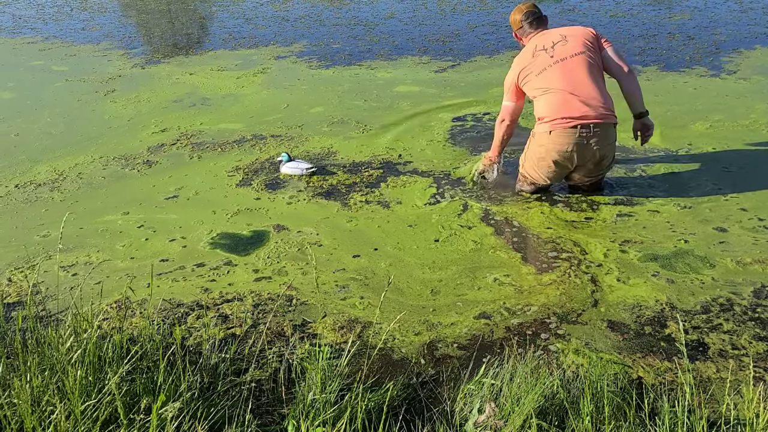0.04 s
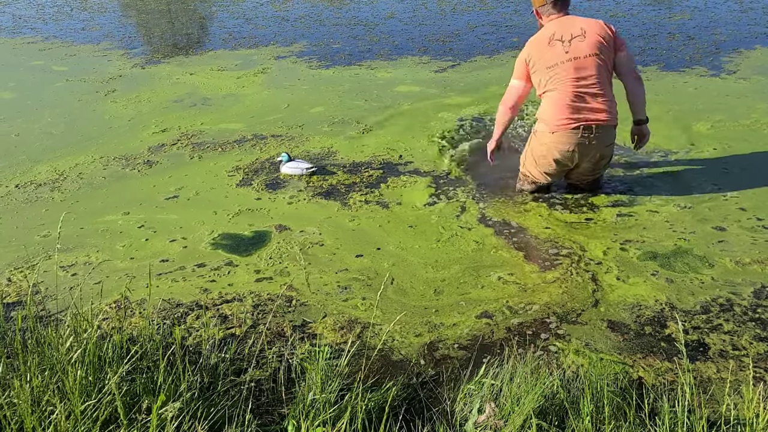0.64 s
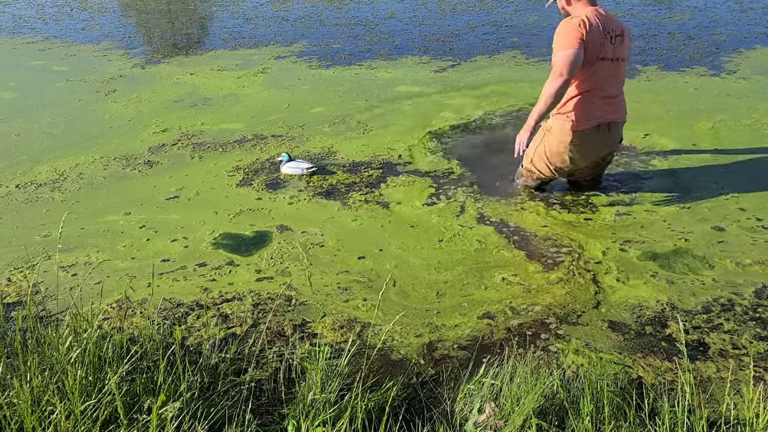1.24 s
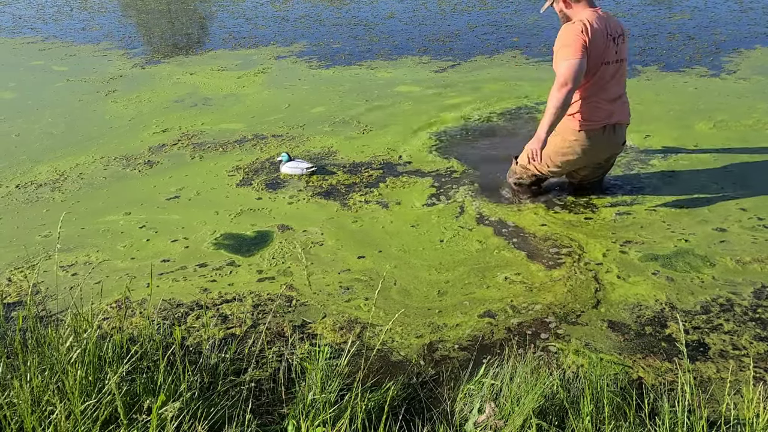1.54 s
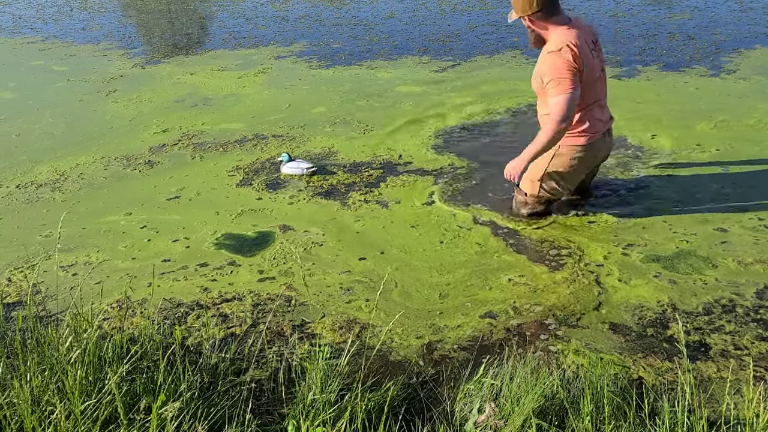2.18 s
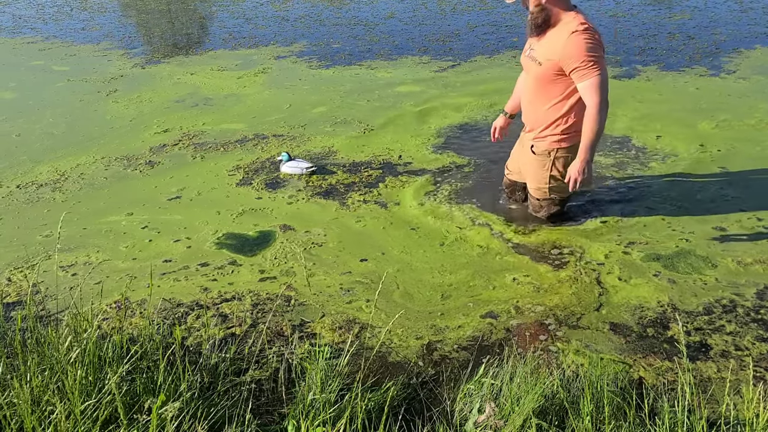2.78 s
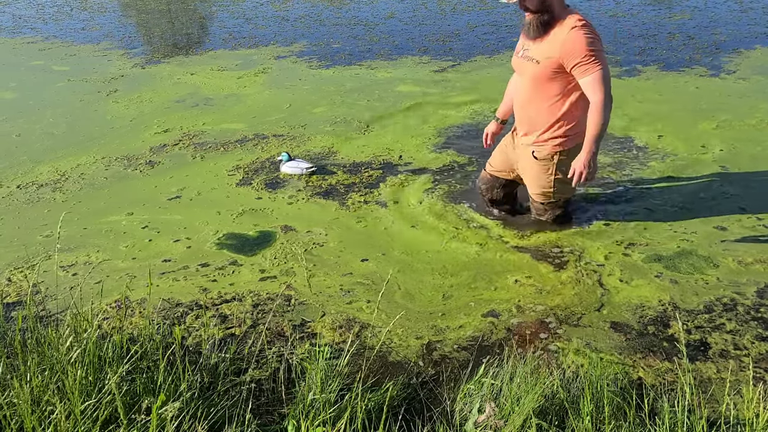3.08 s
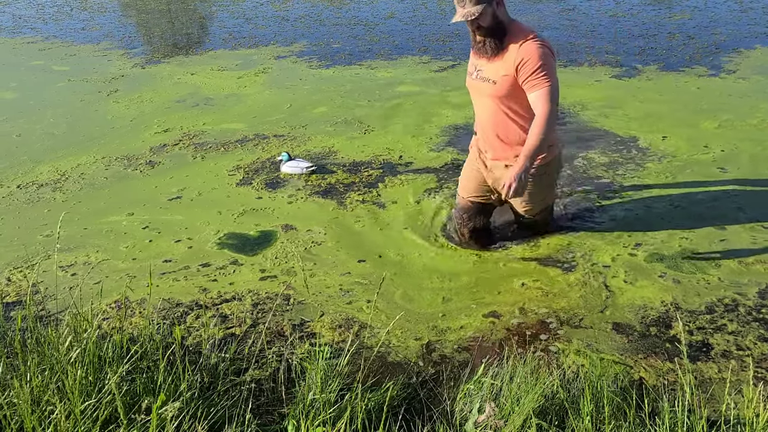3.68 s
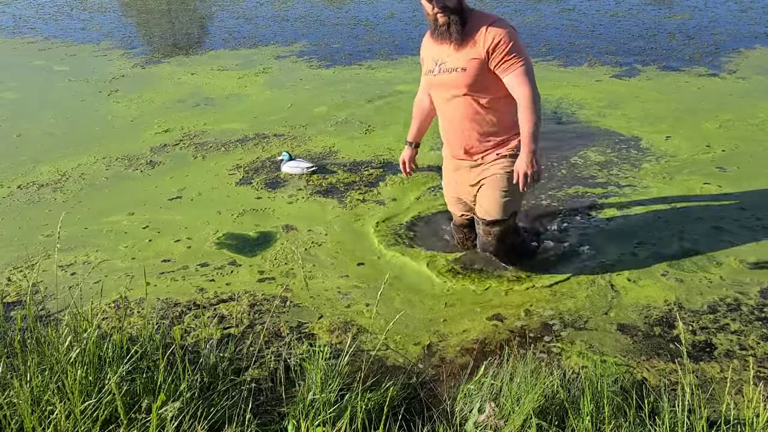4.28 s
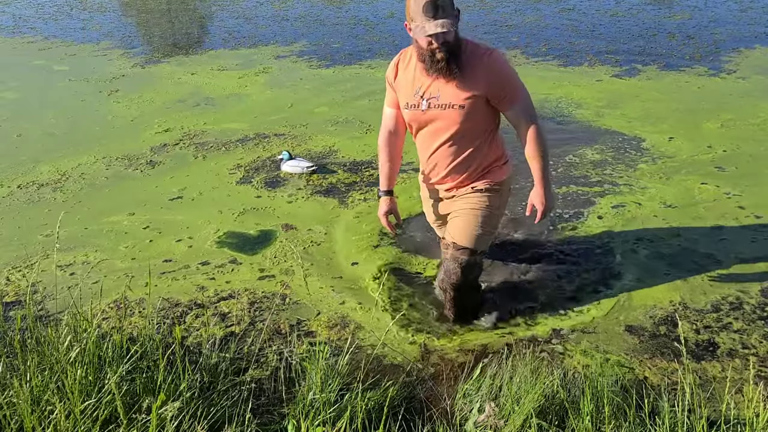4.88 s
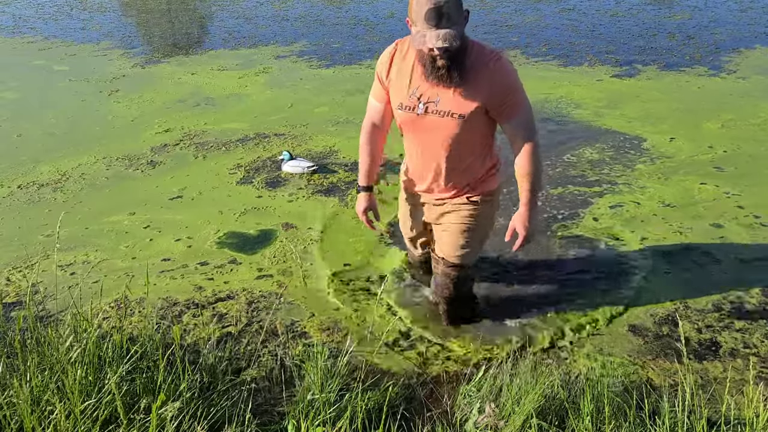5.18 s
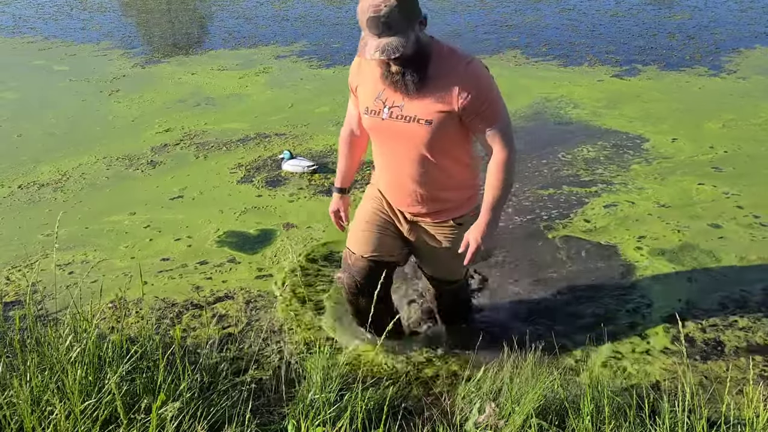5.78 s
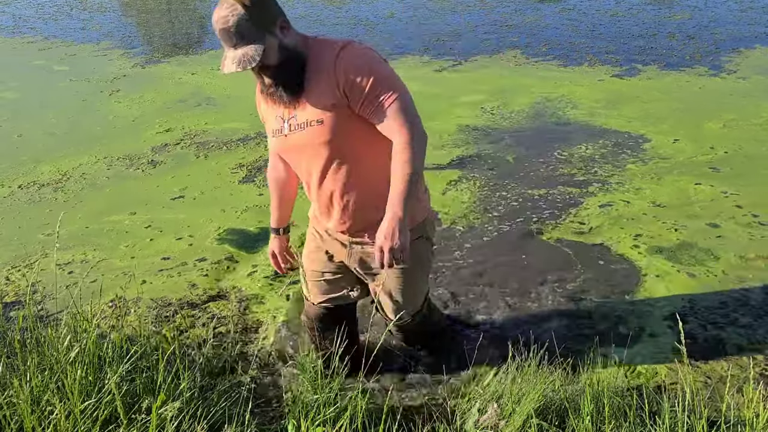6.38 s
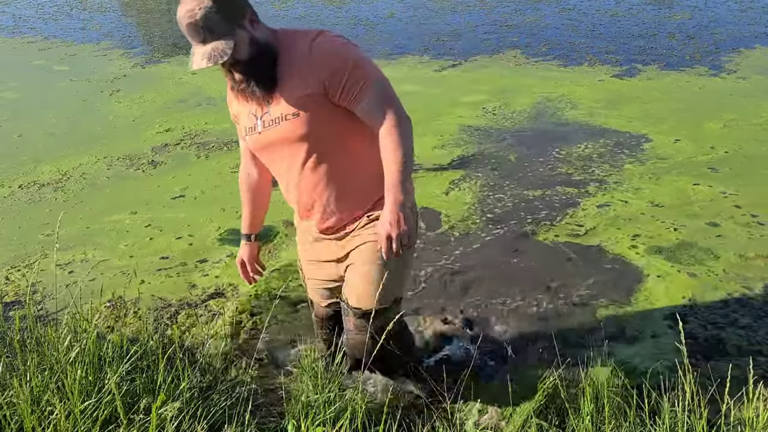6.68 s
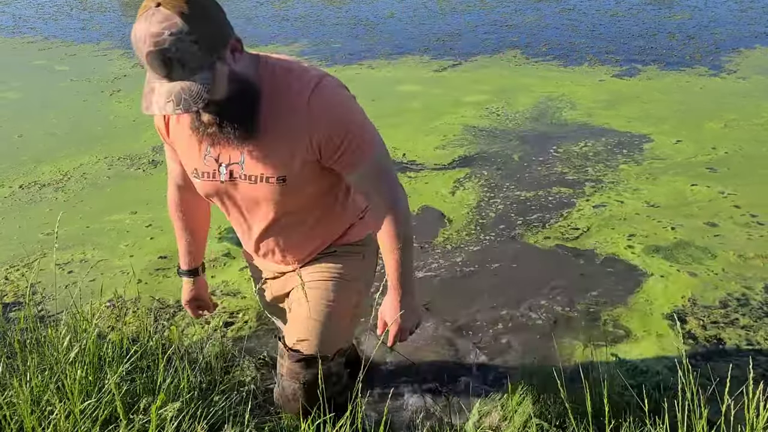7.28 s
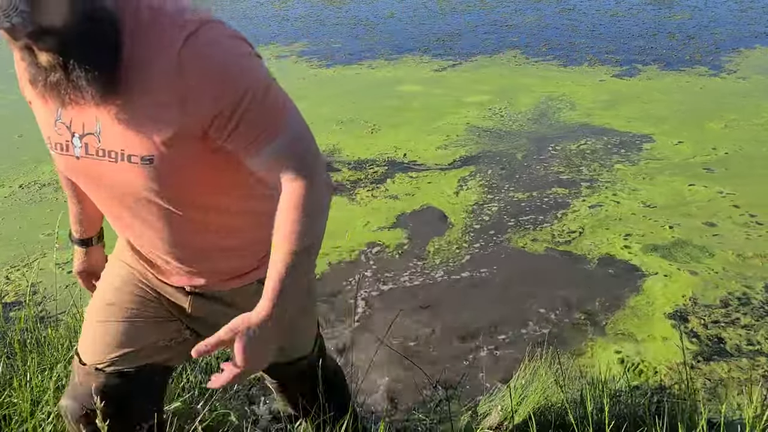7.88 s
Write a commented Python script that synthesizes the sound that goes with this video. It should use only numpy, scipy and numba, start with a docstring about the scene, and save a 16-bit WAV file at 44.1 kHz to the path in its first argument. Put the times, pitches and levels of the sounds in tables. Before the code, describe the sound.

Wading steps gurgle, plop and splash closer through a weedy pond while small birds call and a distant engine hums faintly.

```python
"""A weedy pond: a man in waders walks out towards the bank, growing louder as he comes.
Each stroke of a hand or leg pushes a wave that folds air under (gulps, sloshing bubbles, plops,
slaps) and sheds a spray of drops. At the end, bank grass brushes the waders.
Songbirds call around the pond and a far engine drones under the quiet outdoor air."""
import sys
import numpy as np
from scipy import signal
from scipy.fft import rfft, irfft, next_fast_len
from scipy.io import wavfile
from scipy.ndimage import uniform_filter1d, map_coordinates
from numba import njit

SR = 44100
rng = np.random.default_rng(int(sys.argv[2]) if len(sys.argv) > 2 else 0)


def digitize_waveform(pressure):
    """Quantize a signal to 16-bit integers and store it at the path in sys.argv[1].

    Rows of a 2-D input are taken as channels; values are limited to [-1, 1].
    """
    field = np.atleast_2d(pressure).T
    bounded = np.clip(field, -1, 1)
    quanta = np.round(bounded * 32767).astype(np.int16)
    wavfile.write(sys.argv[1], SR, quanta)


N = 350150
TIME = np.arange(N) / SR

# Pushes through the water: a hand sweeps weed aside, he turns, wades thigh deep, strides through
# the shallows and climbs the bank.
# (time at full force [s], swell [s], hold [s], gulps [dB], slosh [dB], splash [dB], spray [dB])
STROKES = [ (0.03, 0.029, 0.19, -67, -56, -72, -56.5), (0.184, 0.047, 0.16, -70, -52.5, -52, -43),
           (0.464, 0.076, 0.18, -69, -59, -53.5, -47.5), (0.62, 0.029, 0.085, -61, -44.5, -52.5, -49.5),
           (0.699, 0.03, 0.025, -52.5, -51.5, -48.5, -53.5), (.78, 0.029, 0.058, -67, -48.5, -62, -79.5),
           (1.437, 0.04, 0.028, -75, -67.5, -62.5, -62.5), (1.554, 0.052, 0.15, -74, -67, -83, -76),
           (1.765, .02, 0.028, -63, -62, -57, -70), (1.834, 0.032, 0.016, -72, -71, -70, -63.5),
           (3.191, 0.16, 0.19, -68.5, -59.5, -64.5, -66), (3.396, 0.045, 0.064, -71, -71, -62, -66.5),
           (3.549, 0.053, 0.36, -71.5, -58.5, -63, -66), (3.989, 0.064, 0.099, -67.5, -60.5, -58, -61),
           (4.207, .08, 0.12, -74, -67.5, -68.5, -64), (4.414, 0.054, 0.029, -67, -46, -48.5, -54),
           (4.481, 0.041, 0.09, -79, -53.5, -52.5, -51.5), (4.622, 0.026, 0.056, -56.5, -55, -56.5, -54.5),
           (4.693, 0.04, .06, -63.5, -41.5, -48, -54), (4.78, 0.074, 0.084, -45.5, -45, -44.5, -52),
           (4.891, .01, .11, -43.5, -40, -45, -49), (5.059, 0.0086, 0.015, -44, -42.5, -49.5, -59),
           (5.16, 0.095, .04, -64, -51, -59, -66.5), (5.375, 0.15, 0.09, -64, -59.5, -63, -62.5),
           (5.51, 0.095, .01, -65, -59, -49, -65), (5.588, 0.025, 0.012, -51, -40, -36, -48.5),
           (5.716, 0.09, 0.07, -63, -49.5, -48.5, -50), (5.86, 0.13, 0.12, -49.5, -44, -41, -42),
           (5.998, .08, 0.15, -45, -41.5, -41.5, -49), (6.201, .08, 0.073, -49.5, -45.5, -41, -49),
           (6.337, 0.087, 0.077, -47.5, -48, -51, -50.5), (6.577, 0.0088, 0.035, -73.5, -58, -49.5, -58),
           (6.656, .04, 0.019, -77, -42.5, -44, -53), (6.701, .012, 0.083, -44, -35.5, -41, -53.5),
           (6.807, 0.063, 0.19, -40, -38.5, -37.5, -40), (7.003, 0.13, 0.1, -44, -42, -39, -37),
           (7.212, 0.057, 0.026, -66, -59, -54, -54), (7.342, 0.088, 0.17, -67.5, -64, -64.5, -61),
           (7.526, 0.02, 0.2, -57, -42.5, -40.5, -57.5), (7.659, 0.024, 0.06, -42.5, -37, -38.5, -47),
           (7.795, 0.11, 0.12, -48, -44.5, -45.5, -42), (7.908, 0.058, 0.031, -48.5, -50, -37.5, -38.5)]
# Colour of the fine spray: (frequency [Hz], relative level [dB])
SPRAY = [(900, -29), (1400, 7.5), (2100, 8), (3100, 10), (4000, 4.5), (5200, 2), (6700, -5.5), (8000, -0.5),
         (10300, -6.5), (12500, -2.5), (15500, -7)]


def from_db(db):
    """Decibels to gain."""
    return 10 ** (np.asarray(db) / 20)


def rms_one(x):
    """Scale to unit power."""
    return x / np.sqrt(np.mean(x ** 2) + 1e-20)


def in_time(rows):
    """Each column of an automation curve at every sample."""
    s, *columns = np.transpose(rows)
    return [np.interp(TIME, s, c) for c in columns]


def at_hz(points, hz):
    """Read a curve on a log-frequency axis."""
    f, value = np.transpose(points)
    return np.interp(np.log(np.maximum(hz, 1)), np.log(f), value)


def equalise(x, gain_at):
    """Filter by a smooth gain, given as a function of frequency."""
    size = next_fast_len(N + 4096)
    return irfft(rfft(x, size) * gain_at(np.fft.rfftfreq(size, 1 / SR)), size)[..., :N]


def coloured(x, spectrum):
    """Give a signal a spectrum, at unit power."""
    return rms_one(equalise(x, lambda hz: from_db(at_hz(spectrum, hz))))


def drift(per_s):
    """A random modulator with a spread of one, gliding to per_s new values a second."""
    knots = rng.standard_normal(4000)
    return rms_one(map_coordinates(knots, [TIME * per_s], order=1, mode="wrap"))


def bandpass(x, low_hz, high_hz, order=2):
    """Keep one band, with gentle slopes."""
    return signal.sosfilt(signal.butter(order, [low_hz, high_hz], "band", fs=SR, output="sos"), x)


def bursts(s, level_db, t60):
    """Noise hits with an instant attack, dying by 60 dB in t60 seconds; rows: mid, side."""
    hits = np.zeros(N)
    hits[np.clip(s * SR, 0, N - 1).astype(int)] = from_db(level_db)
    envelope = signal.lfilter([1], [1, -from_db(-60 / (t60 * SR))], hits + 1e-18)
    return envelope * rng.standard_normal((2, N))


def reflections(x, t60):
    """A diffuse tail off water, reeds and bank, about as strong as the sound itself."""
    t = TIME[:SR // 2]
    tail = rng.standard_normal((2, len(t))) * from_db(-60 * t / t60) * (1 - np.exp(-20 * t / t60))
    return signal.fftconvolve(x[:1], tail / np.linalg.norm(tail[0]), axes=1)[:, :N]


def outdoor_air(level_db):
    """A steady bed of low rumble and faint hiss."""
    # Colour of the air: (frequency [Hz], relative level [dB])
    air_spectrum = [(20, -14), (32, -19), (45, 4.5), (70, 4), (100, -1.5), (130, -15.5), (180, -25),
                    (260, -23.5), (390, -16.5), (600, -22.5), (1000, -24), (2000, -26.5), (2900, -24.5),
                    (5200, -34), (7000, -42.5), (15500, -40)]
    return from_db(level_db) * coloured(rng.standard_normal((2, N)), air_spectrum)


def far_engine(drone_hz, drone_db, waver_db):
    """Two low tones of distant machinery, wavering on their way through the air."""
    # The engine slowly speeds up, then eases off: (time [s], pitch [Hz], level [dB])
    revs = [(0, 60.9, -61), (.9, 63.7, -56), (2, 68.7, -55.5), (3, 73.3, -53), (4.5, 77.35, -60.5),
            (5.6, 79.7, -57.5), (7.94, 76.1, -71.5)]
    hz, tone_db = in_time(revs)
    climbing = from_db(tone_db + waver_db * drift(7.8)) * np.sin(2 * np.pi * np.cumsum(hz) / SR)
    drone_gain = from_db(drone_db + waver_db * drift(3.7))
    drone = drone_gain * np.sin(2 * np.pi * np.cumsum(drone_hz + 0.47 * drift(3.6)) / SR)
    return np.sqrt(2) * (climbing + drone)


def birds(echo_db, echo_t60, warble):
    """Whistles that bend through three pitches, some with a rasping warble, trailed by their echo."""
    # Cues for each kind of note: (time [s], level [dB])
    calls = {"chip": [(.192, -41), (.33, -53.5), (.518, -44), (.736, -43), (.952, -45.5)],
             "tsip": [(.11, -60), (.871, -63.5)], "buzz": [(.875, -58), (3.215, -60), (3.45, -52.5),
             (3.685, -53.5), (4.81, -54.5)], "churr": [(.99, -63), (1.2, -63.5), (1.47, -61.5)],
             "zeet": [(1.07, -69), (2.26, -71), (2.545, -65.5), (2.855, -62)], "pip": [(3.11, -61)],
             "arch": [(1.589, -49)], "quaver": [(2.771, -55.5)], "slur": [(2.2, -60), (3.44, -54.5),
             (4.205, -57.5)], "teeu": [(2.017, -47.5), (4.115, -55)], "flick": [(5.196, -53.5),
             (5.378, -56.5), (5.543, -55)], "hook": [(5.207, -47.5), (5.386, -48.5), (5.548, -52.5)]}
    # Shape of each kind: (length [s], start pitch [Hz], middle pitch [Hz], end pitch [Hz], rasp [0-1])
    note_shapes = {"chip": (0.038, 3900, 3130, 2820, 0.11), "tsip": (0.041, 5800, 5970, 7200, .1),
                   "buzz": (.095, 6800, 4500, 3500, .75), "zeet": (.06, 5200, 4900, 4750, 0.74),
                   "arch": (0.28, 2520, 3010, 2560, 0.063), "quaver": (0.24, 2780, 3000, 2700, 0.38),
                   "slur": (.11, 3200, 2500, 2250, 0.55), "teeu": (.055, 3600, 2830, 2600, 0.17),
                   "flick": (0.027, 5750, 5450, 4800, 0.33), "hook": (.028, 3650, 3850, 5250, 0.11),
                   "churr": (.13, 2900, 3400, 4600, 0.98), "pip": (0.07, 5200, 5220, 5180, 0.5)}
    song, shake, tremble = np.zeros(N), drift(800), drift(90)
    for kind, notes in calls.items():
        length, *pitches, rasp = note_shapes[kind]
        progress = np.linspace(0, 1, int(length * SR))
        glide_hz = np.polyval(np.polyfit([0, .5, 1], pitches, 2), progress)
        envelope = np.sin(np.pi * progress) ** .5
        for s, level_db in notes:
            span = slice(int(s * SR), int(s * SR) + len(progress))
            hz = glide_hz * (1 + warble * rasp * shake[span])
            gain = from_db(level_db + (2.0 + 4.1 * rasp) * tremble[span])
            song[span] += gain * envelope * np.sin(2 * np.pi * np.cumsum(hz) / SR)
    direct = np.array([song, np.zeros(N)])
    return direct + from_db(echo_db) * reflections(direct, echo_t60)


def grass():
    """Blades slide over the wet waders in a smooth, bright rustle."""
    # Swell as he reaches the bank: (time [s], level [dB])
    brushing = [(0, -100), (7.5, -70), (7.7, -52), (7.82, -42.5), (7.94, -34.5)]
    # Colour of the rustle: (frequency [Hz], relative level [dB])
    rustle_spectrum = [(2500, -3), (5000, -1), (8000, -2), (10500, 2.5), (13000, 3), (15500, 2.5)]
    level_db, = in_time(brushing)
    return from_db(level_db) * coloured(rng.standard_normal((2, N)), rustle_spectrum)


def drops(t60):
    """Single drops slap the weed mat with a bright tick."""
    # Drops landing: (time [s], level [dB])
    landings = [(1.458, -56), (1.869, -48.5), (3.2866, -51), (3.5206, -42.5), (3.701, -53), (4.8228, -39.5),
                (5.0676, -46), (5.5044, -47.5), (5.8062, -42), (6.1434, -47), (6.2243, -32.5),
                (6.2693, -38), (6.31, -39), (6.476, -44.5), (6.567, -45.5), (6.6676, -39.5), (6.74, -41),
                (7.129, -33.5)]
    s, level_db = np.transpose(landings)
    return bandpass(bursts(s, level_db, t60), 2200, 10000, order=1)


def spatter(level_db, per_s, spread_db, t60, colour_db):
    """Stray drops land at random, each tick with a size and a colour of its own."""
    when, size, *tints = rng.random((int(per_s * N / SR), 6)).T
    tick_db = level_db[(when * N).astype(int)] + spread_db * np.minimum(-np.log(1 - size), 3)
    edges_hz, ticks = np.geomspace(1700, 15000, 5), 0
    for low, high, tint in zip(edges_hz, edges_hz[1:], tints):
        band_db = tick_db + at_hz(SPRAY, np.sqrt(low * high)) + colour_db * (tint - .5)
        ticks = ticks + bandpass(bursts(when * N / SR, band_db, t60), low, high)
    return ticks


@njit
def bubbles(s, height, hz, t60, rise, side):
    """Each bubble swells, rings down and rises in pitch as it nears the surface; rows: mid, side."""
    out = np.zeros((2, N))
    for k in range(len(s)):
        start = int(s[k] * SR)
        for i in range(max(0, -start), min(int(t60[k] * SR), N - start)):
            age = i / SR / t60[k]
            envelope = 2.4 * (1 - np.exp(-16 * age)) * np.exp(-np.log(1000) * age)
            wave = height[k] * envelope * np.sin(2 * np.pi * hz[k] * i / SR * (1 + rise[k] * age / 2))
            out[0, start + i] += wave
            out[1, start + i] += wave * side[k]
    return out


def air_pockets(s, level_db, hz, rise, cycles, splat_db, splat_t60):
    """Large bubbles ring one by one; the closing cavity gives each a short wet splat."""
    t60 = cycles / hz  # big, low bubbles ring longer
    centred = np.zeros(len(s))
    rings = bubbles(s.copy(), from_db(level_db), hz.copy(), t60, rise * np.ones(len(s)), centred)
    return rings + bandpass(bursts(s, level_db + splat_db, splat_t60), 700, 3600)


def plops():
    """Closed pockets of air ring roundly, with little splat."""
    # Single pockets: (time [s], level [dB], pitch [Hz], pitch rise over the ring [fraction])
    cues = [(.0464, -42.5, 597, 0.029), (.095, -37.5, 653, 0), (0.1547, -37.5, 1230, 0.74),
            (.284, -37.5, 790, 0.034), (.458, -25.5, 1160, 0.58), (.6079, -38.5, 808, 0.062),
            (0.7713, -37, 1060, 0.19), (.885, -47, 950, 0.16), (.887, -43.5, 1780, .1),
            (1.6593, -40, 2010, 0), (1.766, -41.5, 1420, 0), (3.2762, -40, 344, 0.32),
            (3.352, -41, 1290, 0.81), (3.43, -47, 804, 0.12), (3.566, -48, 1100, 0.018),
            (3.65, -48, 900, .2), (3.7634, -40.5, 1350, 0), (3.8483, -43.5, 1860, 0),
            (3.8551, -42, 630, 0.015), (4.4092, -35.5, 739, 0), (4.603, -41, 470, 0.7),
            (4.7052, -25.5, 764, 0), (4.8924, -29.5, 594, 0), (4.9776, -25.5, 348, 0.014),
            (4.986, -27, 523, 0.79), (5.0658, -33, 1136, 0.29), (5.189, -39.5, 677, 0.16),
            (5.6173, -27, 763, 0.14), (5.844, -29.5, 1132, 0.069), (5.9076, -37, 363, 0.093),
            (5.9979, -35, 276, 0.22), (6.3672, -31, 321, 0.47), (6.694, -26.5, 654, 0.17),
            (6.697, -33, 341, 0.059), (6.741, -24, 1300, 0.16), (6.8691, -24, 533, 0.59),
            (7.031, -27, 1060, 0.17), (7.5165, -30.5, 1240, .3), (7.5745, -21, 657, 0.9),
            (7.6522, -26, 378, 0.88), (7.7749, -31, 755, .3), (7.815, -28.5, 352.5, .5)]
    return air_pockets(*np.transpose(cues), cycles=31.7, splat_db=-19, splat_t60=.06)


def slaps():
    """Water slaps shut against a leg: a choked ring with a strong splat."""
    # Single slaps: (time [s], level [dB], pitch [Hz])
    cues = [(0.7216, -36, 540), (3.5207, -39, 1160), (4.9161, -25, 470), (5.1662, -32, 1110),
            (5.59, -29.5, 730), (5.704, -26.5, 2650), (5.7335, -27, 1390), (6.0473, -20.5, 1200),
            (6.0758, -30.5, 260), (6.0732, -22.5, 1300), (6.141, -14, 960), (6.1417, -18, 2240),
            (6.2245, -21, 1140), (6.343, -22.5, 1420), (6.477, -29.5, 2900), (6.742, -25, 885),
            (6.9119, -22, 1160), (7.13, -18.5, 2430), (7.6463, -19.5, 490)]
    return air_pockets(*np.transpose(cues), rise=0.2, cycles=9.8, splat_db=-9, splat_t60=0.028)


def stirring(peaks_db, fade_db_per_s, wake_db, build_db=0):
    """Envelope in dB of one water layer: each stroke swells, holds, fades and leaves a faint wake."""
    swell_db, wake_fade_db_per_s = 19, 20.5
    t, power = TIME[::32], 1e-9
    for (s, swell, hold, *_), peak_db in zip(STROKES, peaks_db):
        early, late = np.maximum(s - t, 0), np.maximum(t - s - hold, 0)
        hold_left = np.clip(1 - (t - s) / hold, 0, 1)
        held_db = peak_db - swell_db * early / swell - build_db * hold_left
        stroke = from_db(held_db - fade_db_per_s * late)
        wake = from_db(held_db + wake_db - wake_fade_db_per_s * late)
        power = power + stroke ** 2 + wake ** 2
    return np.interp(TIME, t, 10 * np.log10(power))


def froth(level_db, spectrum, per_s, cycles, rise, spread_db, rush_db, flutter_db, even_s):
    """A swarm of bubbles of mixed sizes over the rush of moving water, surging irregularly."""
    when, pitch, strength, ring, lift, sign, place, luck = rng.random((int(per_s * N / SR), 8)).T
    force_db = level_db - level_db.max()
    # gently stirred water makes fewer bubbles, so they stand apart
    density = from_db(.38 * force_db)[(when * N).astype(int)]
    low, high = spectrum[0][0], min(spectrum[-1][0], SR / 3)
    hz = low * (high / low) ** pitch
    accent = from_db(spread_db * np.minimum(-np.log(1 - strength), 4))
    # small bubbles die sooner, so they need more height to carry the same power per Hz
    height = accent * hz / high * np.sign(sign - .5) / np.sqrt(density)
    t60 = cycles * (.5 + ring) / hz * (luck < density)
    swarm = bubbles(when * N / SR, height, hz, t60, rise * lift, np.sqrt(2) * np.cos(np.pi * place))
    rush_gain = from_db(rush_db + 0.2 * force_db)  # gentle strokes leave bare bubbles
    water = coloured(swarm, spectrum) + rush_gain * coloured(rng.standard_normal((2, N)), spectrum)
    water = water * from_db(flutter_db * drift(45))
    # even out the slow swings, so the strokes set the loudness
    window = int(even_s * SR)
    power = uniform_filter1d(uniform_filter1d(water[0] ** 2, window), window)
    return from_db(level_db) * water / np.sqrt(np.abs(power) + 1e-9)


def wading():
    """Legs fold big air pockets under, the wave breaks into smaller bubbles, and drops patter back."""
    # Colours of deep gulps, mid slosh and bright splash: (frequency [Hz], relative level [dB])
    gulp_spectrum = [(100, -12), (160, -18.5), (230, -8), (330, 3), (420, 3), (550, -26.5), (750, -22)]
    slosh_spectrum = [(290, -47), (400, -18), (520, -7.5), (720, -3), (920, -6), (1200, -16), (1700, -43)]
    splash_spectrum = [(700, -28), (950, -6.5), (1250, -1.5), (1600, -5), (2100, -12.5), (3100, -16.5),
                       (4500, -29.5), (7000, -28)]
    gulp_peaks, slosh_peaks, splash_peaks, spray_peaks = np.transpose(STROKES)[3:]
    gulp_db = stirring(gulp_peaks, fade_db_per_s=220, wake_db=-19)
    slosh_db = stirring(slosh_peaks, fade_db_per_s=171, wake_db=-26.5)
    splash_db = stirring(splash_peaks, fade_db_per_s=135, wake_db=-23)
    spray_db = stirring(spray_peaks, fade_db_per_s=159, wake_db=-19, build_db=4)
    gulps = froth(gulp_db, gulp_spectrum, per_s=260, cycles=28, rise=0.585,
                  spread_db=5, rush_db=-4, flutter_db=2, even_s=0.041)
    slosh = froth(slosh_db, slosh_spectrum, per_s=520, cycles=41, rise=0.27,
                  spread_db=2.5, rush_db=-6.5, flutter_db=0.5, even_s=0.054)
    splash = froth(splash_db, splash_spectrum, per_s=1600, cycles=36.4, rise=0.28,
                   spread_db=3.5, rush_db=-3.5, flutter_db=2.5, even_s=0.064)
    spray = froth(spray_db, SPRAY, per_s=4500, cycles=24, rise=.1,
                  spread_db=3.8, rush_db=2, flutter_db=1.3, even_s=.07)
    ticks = spatter(spray_db - 6, per_s=24, spread_db=2.2, t60=.013, colour_db=14)
    return gulps + slosh + splash + spray + ticks


def stereo_image(mid, side):
    """Two microphone ports share the bass, differ in the treble, and the right one hears him first."""
    # How alike the two sides are: (frequency [Hz], likeness [0-1])
    likeness = [(60, .97), (400, .97), (800, .93), (1300, .9), (2000, .4), (3000, .65), (4300, .2),
                (6000, .43), (9000, .15), (15000, .16)]
    # Tilt between the sides: (frequency [Hz], left minus right [dB])
    balance = [(60, 1), (200, 2.5), (700, -0.2), (1300, 0), (1900, -0.3), (2900, -3.5), (4300, -7),
               (5900, -10), (8000, -1), (15000, -4)]
    # His bearing, applied to the whole mix: (time [s], lead of the right side [ms])
    bearing = [(0, 0.12), (1, 0.14), (4.8, 0.13), (5.8, 0.056), (6.9, 0.089), (7.6, 0.059), (7.94, 0.0025)]
    mid = equalise(mid, lambda hz: np.sqrt((1 + at_hz(likeness, hz)) / 2))
    side = equalise(side, lambda hz: np.sqrt((1 - at_hz(likeness, hz)) / 2))
    left = equalise(mid + side, lambda hz: from_db(at_hz(balance, hz) / 2))
    right = equalise(mid - side, lambda hz: from_db(-at_hz(balance, hz) / 2))
    lead_ms, = in_time(bearing)
    late_left = map_coordinates(left, [np.arange(N) - lead_ms * SR / 1000], order=3)
    return np.array([late_left, right])


def scene():
    """Water, grass and birds over the outdoor air and the far engine."""
    water = wading() + plops() + slaps() + drops(t60=0.038)
    echoes = from_db(-23) * reflections(water, t60=.16)
    air = outdoor_air(level_db=-56.5)
    song = birds(echo_db=-14, echo_t60=0.28, warble=0.086)
    mid, side = water + echoes + air + grass() + song
    engine = far_engine(drone_hz=47.3, drone_db=-68, waver_db=1)
    return stereo_image(mid + engine, side)


def record(dry):
    """A steep low-pass takes off the very top."""
    cutoff_hz = 15750
    return signal.sosfilt(signal.ellip(10, .1, 80, cutoff_hz, fs=SR, output="sos"), dry)


dry = scene()
out = record(dry)
digitize_waveform(out)
```